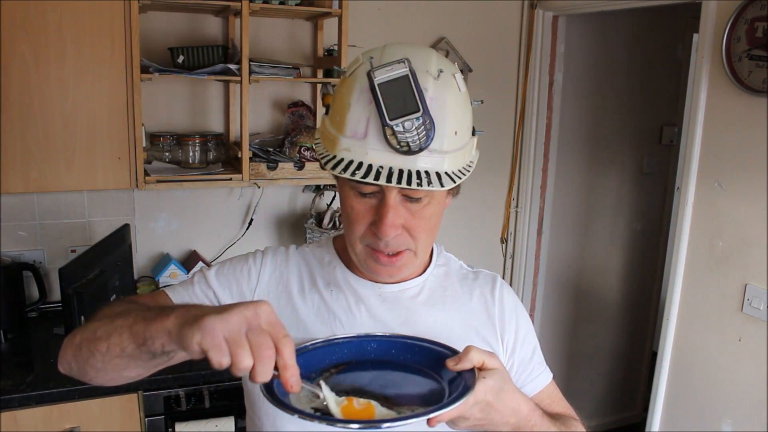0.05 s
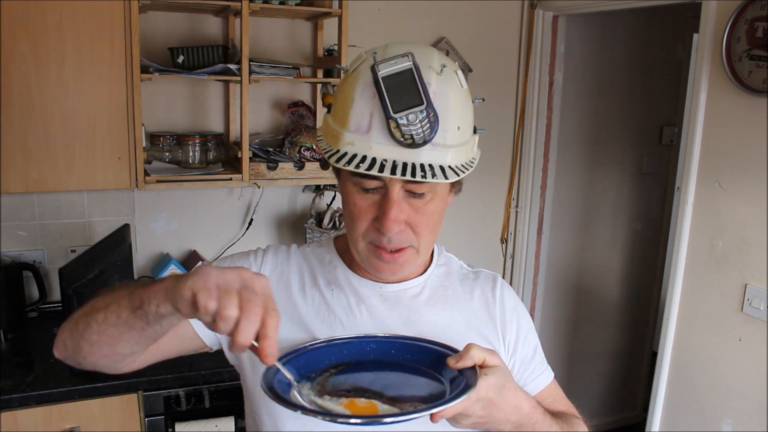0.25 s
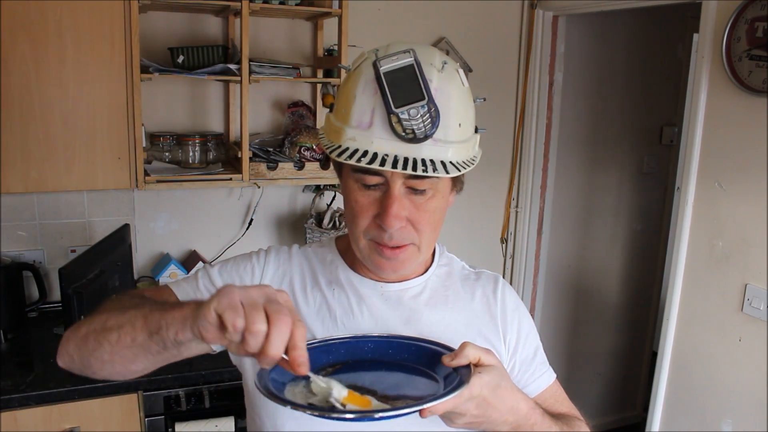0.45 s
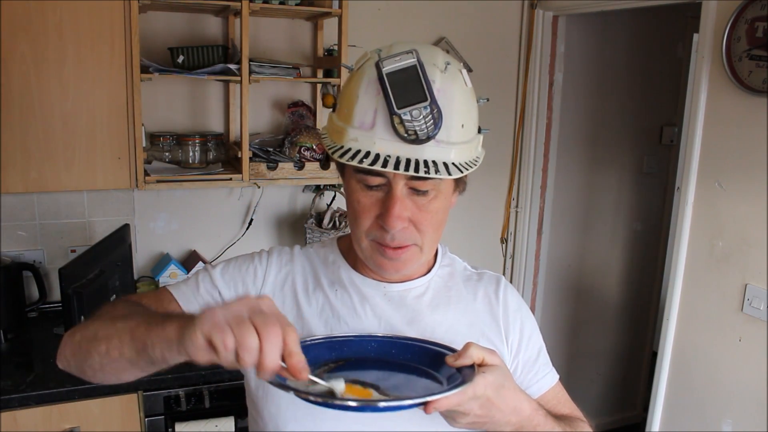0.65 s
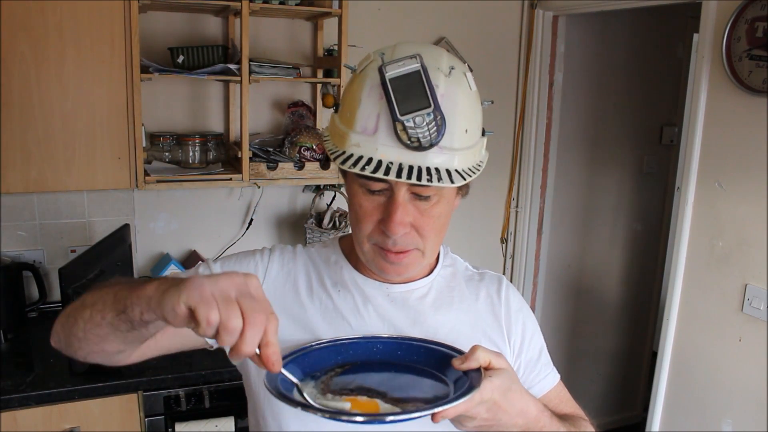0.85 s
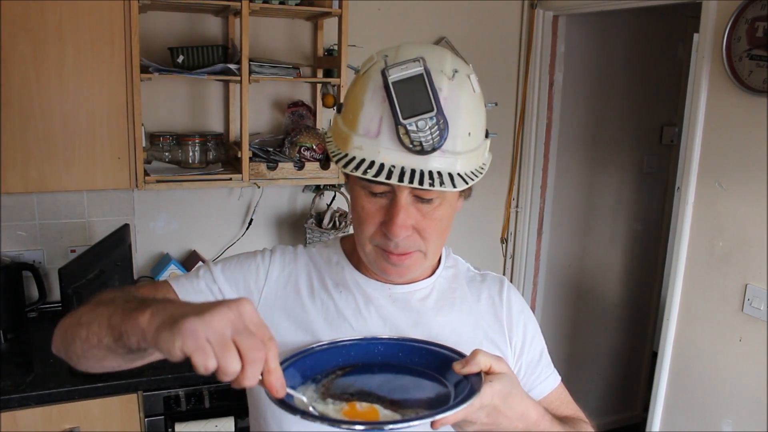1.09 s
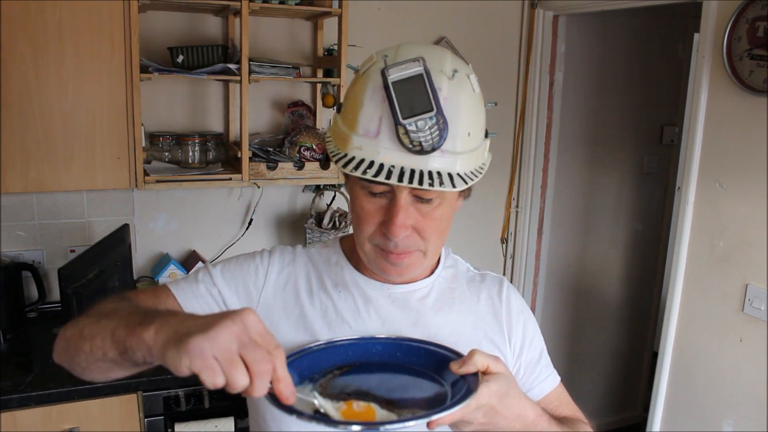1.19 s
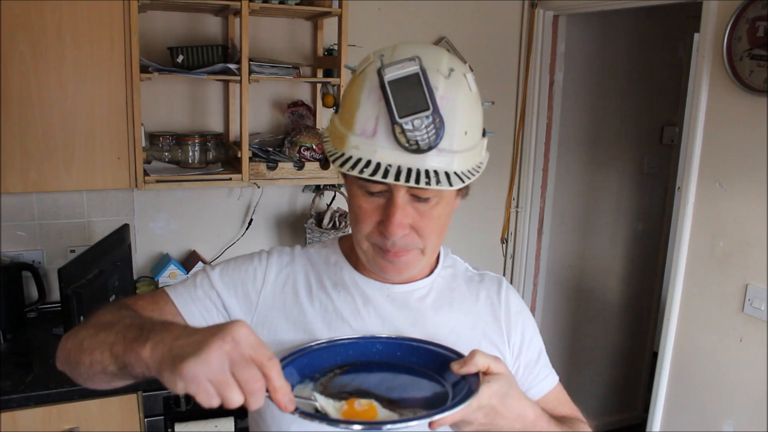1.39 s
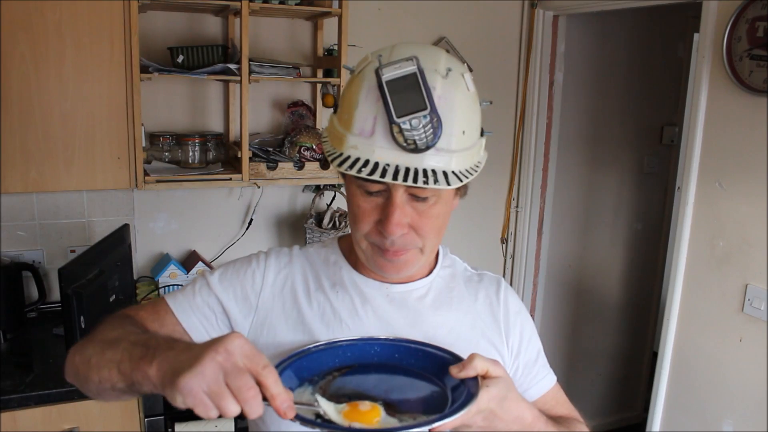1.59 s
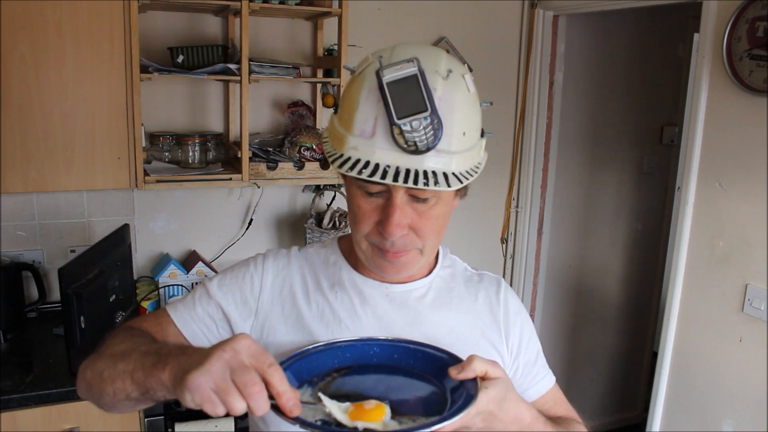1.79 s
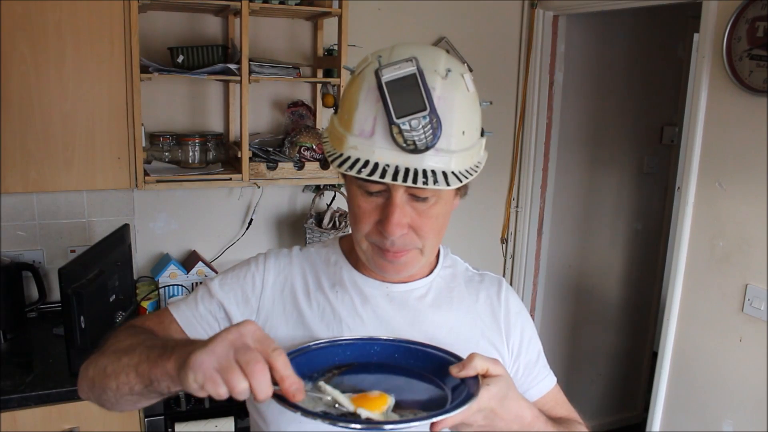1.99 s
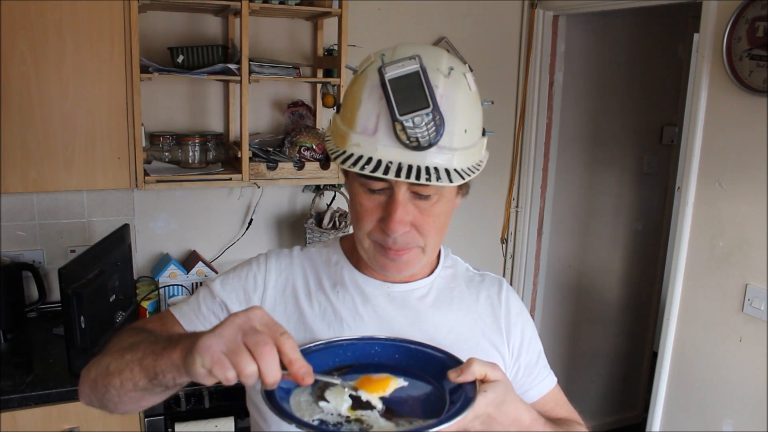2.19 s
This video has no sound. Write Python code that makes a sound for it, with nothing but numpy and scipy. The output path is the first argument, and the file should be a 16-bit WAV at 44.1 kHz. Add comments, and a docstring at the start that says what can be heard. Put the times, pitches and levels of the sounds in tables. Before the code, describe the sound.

Fork clinking and scraping on a dinner plate while cutting soft food, faint appliance hum behind

```python
"""In a small kitchen, a steel fork cuts a fried egg on a hand-held plate.
The fork strikes the plate, drags across it twice in stick-slip scrapes, and taps it again.
Blows excite the damped modes of plate and fork; trains of slips excite them during the drags.
The soft food squelches in puffs of filtered noise, and the plate gives a low rubbing note.
An appliance hums as a wavering sine, and near the end a second low tone runs down."""
import sys
import numpy as np
from scipy import signal
from scipy.fft import rfft, irfft
from scipy.io import wavfile

SR = 44100
rng = np.random.default_rng(int(sys.argv[2]) if len(sys.argv) > 2 else 0)


def generate_wav(signal):
    """Clip the signal to [-1, 1] and save it as 16-bit WAV at the path in sys.argv[1]."""
    frames = np.transpose(np.atleast_2d(signal))
    scaled = np.clip(frames, -1, 1) * 32767
    pcm = np.round(scaled).astype(np.int16)
    wavfile.write(sys.argv[1], SR, pcm)


N = 99225

# modes of the plate, damped by hand and food: (frequency [Hz], relative level [dB], T60 [s])
PLATE_MODES = [(386, -11.5, 0.048), (924, -23, 0.056), (1315, -2.5, 0.026), (1530, 1, 0.0061),
               (2178, -7.5, 0.078), (2365, 1.5, 0.021), (2850, -2.5, 0.017), (3044, 1.5, 0.022),
               (3747, 1.5, 0.023), (4196, -5, 0.053), (4883, -11.5, 0.036), (5640, -12.5, 0.048),
               (6300, -15, 0.0081), (6970, 0.5, 0.0081)]
# modes of the fork: (frequency [Hz], relative level [dB], T60 [s])
FORK_MODES = [(769, -12.5, 0.069), (950, -13, 0.059), (1514, -6, 0.03), (1750, -9, 0.069), (2296, -6, 0.12),
              (2523, 10.5, 0.027), (2850, -24.5, 0.13), (3160, -1, 0.1), (3440, 0, 0.025), (3912, 4, 0.029),
              (4494, -8.5, 0.013), (5280, -13.5, 0.062), (7370, -18, 0.034)]
# spectrum of bare steel ticking on glaze: (frequency [Hz], relative level [dB])
GLAZE_SPECTRUM = [(100, -38), (2500, -21), (5500, 6), (8000, 2), (11000, -3.5), (16000, -15)]


def amp(db):
    """Level and amplitude: 20 dB is a factor of ten."""
    return 10 ** (np.asarray(db) / 20)


def evened(x):
    """Normalization: scales a signal to rms 1."""
    return x / np.sqrt(np.mean(x ** 2) + 1e-20)


def read(points, hz):
    """Interpolation of a spectrum along a logarithmic frequency axis."""
    f, value = np.transpose(points)
    return np.interp(np.log(hz + 1), np.log(f + 1), value)


def curve(rows, axis=1):
    """Linear interpolation: one column of a time table at every sample."""
    rows = np.array(rows)
    return np.interp(np.arange(N) / SR, rows[:, 0], rows[:, axis])


def add(mix, s, sound):
    """Superposition: mixes a sound in at time s."""
    start = max(round(s * SR), 0)
    part = mix[start:][:len(sound)]
    part += sound[:len(part)]


def high_pass(x, order, cut_hz):
    """Butterworth filter: attenuates what lies below the cutoff."""
    return signal.sosfilt(signal.butter(order, cut_hz, "highpass", fs=SR, output="sos"), x)


def noise(spectrum):
    """Spectral shaping: steady noise with the given relative spectrum, rms 1."""
    gain = amp(read(spectrum, np.fft.rfftfreq(N, 1 / SR)))
    return evened(irfft(rfft(rng.standard_normal(N)) * gain, N))


def band(hz, width_hz):
    """Resonance: noise in one band, at half amplitude width_hz from its centre; rms 1."""
    f = np.fft.rfftfreq(N, 1 / SR)
    resonance = 1 / (1 + ((f - hz) / width_hz) ** 2)
    return evened(irfft(rfft(rng.standard_normal(N)) * resonance, N))


def click(spectrum, size=8192):
    """Minimum phase: a causal click of energy 1 with the given spectrum."""
    log_gain = np.log(amp(read(spectrum, abs(np.fft.fftfreq(size, 1 / SR)))))
    # the Hilbert transform of the log gain supplies the phase
    out = np.fft.ifft(np.exp(np.conj(signal.hilbert(log_gain)))).real
    return out / np.linalg.norm(out)


def ring(modes, size=8192):
    """Modal superposition: the dying modes of a small struck object, weak in the bass, energy 1."""
    t = np.arange(size) / SR
    out = np.zeros(size)
    for k, (hz, db, t60) in enumerate(modes):
        decay = np.exp(-np.log(1000) * t / t60)
        out += (-1) ** k * amp(db) * decay * np.sin(2 * np.pi * hz * t)
    out = high_pass(out, 2, 300)
    return out / np.linalg.norm(out)


def burst(spectrum, decay_s):
    """Rough contact: tiny slips that die in a few milliseconds, energy 1."""
    t = np.arange(SR // 40) / SR
    slips = rng.standard_normal(len(t)) * np.exp(-t / decay_s)
    out = signal.fftconvolve(slips, click(spectrum))
    return out / np.linalg.norm(out)


def glaze():
    """Hard contact: bare steel on glaze gives a short, high tick."""
    return burst(GLAZE_SPECTRUM, decay_s=0.0071)


def contact(s, blow, bright_hz, tick_db):
    """Contact stiffness: a softer contact rolls off a blow's treble; bare steel adds a tick."""
    u = 1j * np.fft.rfftfreq(len(blow), 1 / SR) / bright_hz
    softened = irfft(rfft(blow) / (1 + np.sqrt(2) * u + u ** 2))
    out = np.zeros(N)
    add(out, s, softened)
    add(out, s, amp(tick_db) * glaze())
    return out


def pair(a, b, likeness):
    """Coherence: two unrelated signals become a stereo pair of given likeness at each frequency."""
    same = np.clip(read(likeness, np.fft.rfftfreq(len(a), 1 / SR)), -1, 1)
    right = irfft(same * rfft(a) + np.sqrt(1 - same ** 2) * rfft(b), len(a))
    return np.array([a, right])


def kitchen(x, wet_db):
    """Room impulse response: direct sound, early echoes and an exponentially decaying diffuse tail."""
    # reverberation time: (frequency [Hz], T60 [s])
    room_t60 = [(150, 0.26), (600, 0.3), (1800, 0.33), (4500, 0.35), (9000, 0.27), (16000, 0.18)]
    # likeness of the two sides of the tail: (frequency [Hz], left-right correlation [-1 to 1])
    room_likeness = [(100, -0.51), (500, 0.99), (1500, 0.62), (3000, 0.5), (5000, 0.48), (8000, -0.17),
                     (16000, -0.77)]
    # early echoes off chest, hat and cupboards: (left delay [s], right delay [s], gain [ratio])
    early_echoes = [(.0034, 0.003, 0.3), (.0066, 0.0063, 0.18), (.0078, 0.0091, -0.096),
                    (0.0166, .0144, 0.18)]
    onset_s = 0.0017

    diffuse = pair(*rng.standard_normal((2, SR // 2)), room_likeness)
    hz, t, z = signal.stft(diffuse, SR, nperseg=256)
    decay = np.exp(-np.log(1000) * t / read(room_t60, hz)[:, None])
    response = signal.istft(z * decay, SR, nperseg=256)[1]
    response = response * np.minimum(np.arange(response.shape[1]) / SR / onset_s, 1) ** 2
    # energy of the left tail relative to the direct sound
    response *= amp(wet_db) / np.linalg.norm(response[0])
    response[:, 0] += 1  # direct sound
    for left_s, right_s, gain in early_echoes:
        response[[0, 1], [round(left_s * SR), round(right_s * SR)]] += gain
    return signal.fftconvolve(x[None], response, axes=1)[:, :N]


def room_air(level_db=-54):
    """Broadband noise: steady room air, almost uncorrelated between the sides."""
    # spectrum of the air: (frequency [Hz], relative density [dB per Hz])
    air_spectrum = [(15, -44), (25, -24.5), (58, -17), (92, -2), (130, -5), (180, -5.5), (439, -9.5),
                    (775, -10), (5880, -17.5), (11900, -25.5), (16000, -31.5)]
    # likeness of the two sides: (frequency [Hz], left-right correlation [-1 to 1])
    air_likeness = [(40, 0.18), (500, 0)]
    return amp(level_db) * pair(noise(air_spectrum), noise(air_spectrum), air_likeness)


def appliance(hum_db=1, octave_db=-21, rumble_db=-61):
    """Phase integration: a wavering hum with its octave, a lower tone running down, and rumble."""
    # the hum: (time [s], level before hum_db [dB], frequency [Hz])
    hum_course = [(0.0, -55, 134.3), (0.22, -48.5, 133.4), (0.27, -61, 129.3), (0.37, -47.5, 134.8),
                  (0.47, -41, 133.6), (0.66, -52, 135.4), (0.87, -45, 130), (1.02, -61, 134.7),
                  (1.13, -51.5, 131.6), (1.23, -54.5, 133.1), (1.28, -71.5, 130.9), (1.48, -49.5, 132.3),
                  (1.63, -55.5, 132.3), (2.01, -52.5, 129.5), (2.1, -64, 128.1), (2.25, -52.5, 129.6)]
    # the tone that runs down: (time [s], frequency [Hz], rms level [dB])
    rundown_course = [(0, 73.2, -63), (.5, 71.1, -64.5), (1.0, 67.46, -73), (1.55, 66.5, -84),
                      (1.7, 59.85, -55.5), (1.9, 53, -53.5), (2.1, 45.3, -47), (2.19, 42.9, -56.5),
                      (2.25, 40.3, -70)]
    hum_phase = 2 * np.pi * np.cumsum(curve(hum_course, axis=2)) / SR
    hum_tone = np.sin(hum_phase) + amp(octave_db) * np.sin(2 * hum_phase)
    hum = amp(curve(hum_course) + hum_db) * hum_tone
    low_phase = 2 * np.pi * np.cumsum(curve(rundown_course)) / SR
    low = amp(curve(rundown_course, axis=2)) * np.sin(low_phase)
    rumble = amp(rumble_db) * band(57.3, 12)
    return np.sqrt(2) * (hum + low) + rumble  # root two turns rms into sine amplitude


def ticking(count=4, decay_s=0.0055, first_s=1.851, period_s=0.083, tick_hz=681.4, tick_db=-50.5):
    """Damped oscillation: faint, evenly spaced ticks, each a quickly dying note."""
    out = np.zeros(N)
    t = np.arange(SR // 10) / SR
    tick = amp(tick_db) * np.sin(2 * np.pi * tick_hz * t) * np.exp(-t / decay_s)
    for k in range(count):
        add(out, first_s + k * period_s, tick)
    return out


def food(attack_s=0.00023, width_hz=300, wet_db=-15, low_cut_hz=330):
    """Filtered noise: the pushed food gives soft dull puffs with a little wet fizz."""
    # puffs, the last of them a faint late tick near 681 Hz, like those in ticking():
    # (time [s], twice the decay constant [s], level before decay [dB], centre [Hz])
    puffs = [(0.161, 0.019, -38, 668), (0.176, 0.048, -40.5, 593), (0.226, 0.018, -32.5, 747),
             (0.234, 0.022, -26.5, 860), (.648, 0.016, -39, 680), (.662, 0.0092, -38, 570),
             (0.965, 0.023, -43, 560), (.47, .09, -48.5, 720), (1.511, 0.035, -59, 910),
             (1.552, .014, -50, 620), (2.226, 0.014, -54, 681)]
    out = np.zeros(N)
    t = np.arange(SR // 4) / SR
    for s, length, db, hz in puffs:
        puff = (band(hz, width_hz) + amp(wet_db) * band(2500, 2000))[:len(t)]
        envelope = np.minimum(t / attack_s, 1) * np.exp(-2 * t / length)
        add(out, s, amp(db) * puff * envelope)
    return high_pass(out, 4, low_cut_hz)


def rubbing():
    """Driven resonance: fork pressure, and later handling, give the plate a low note."""
    # level of the note: (time [s], level before the room [dB])
    rub_level = [(0, -58.5), (.13, -56.5), (.22, -47), (.31, -43.5), (.36, -37), (.43, -44.5), (.6, -58),
                 (.68, -52), (.76, -46.5), (.82, -59.5), (.97, -46), (1.06, -63.5), (1.33, -66),
                 (1.385, -55.5), (1.42, -60.5), (1.55, -60.5), (1.8, -80), (2.11, -73), (2.15, -56.5),
                 (2.2, -70)]
    # its resonances: (frequency [Hz], half-width at half amplitude [Hz], relative level [dB])
    rub_modes = [(359.3, 29, -2.5), (413.6, 30, -2.5)]
    note = sum(amp(db) * band(hz, width) for hz, width, db in rub_modes)
    return amp(curve(rub_level)) * evened(note)


def brushes(wet_db=2):
    """Light impact: the tines brush the glaze with high ticks."""
    # brushes: (time [s], level of the direct sound [dB])
    brush_times = [(0.165, -30), (0.345, -8.5), (0.61, -30), (.649, -31.5), (1.277, -36.5)]
    out = np.zeros(N)
    for s, db in brush_times:
        add(out, s, amp(db) * glaze())
    return kitchen(out, wet_db)


def taps(wet_db=0, decay_s=.0012):
    """Brief impact: the fork's edge lands with a small crisp click."""
    # taps: (time [s], level of the direct sound [dB])
    tap_times = [(1.4392, -13.5), (1.4413, -13), (1.4483, -24)]
    # spectrum of a tap: (frequency [Hz], relative level [dB])
    tap_spectrum = [(100, -16), (550, -14), (950, -0.5), (1200, -8.5), (1650, 4.5), (3000, 0), (3750, -0.5),
                    (4900, -6.5), (5700, -26), (9000, -35), (16000, -40)]
    out = np.zeros(N)
    for s, db in tap_times:
        add(out, s, amp(db) * burst(tap_spectrum, decay_s))
    return kitchen(out, wet_db)


def knocks(wet_db=1, decay_s=0.0025):
    """Damped impact: through the food the fork makes a dry clack, with a faint tick on the glaze."""
    # knocks: (time [s], level before softening [dB], brightness [Hz], glaze tick level [dB])
    knock_times = [(1.5957, -0.5, 2420, -27), (1.5978, -3, 2400, -26), (1.6066, -4, 2100, -33)]
    # spectrum of a knock: (frequency [Hz], relative level [dB])
    knock_spectrum = [(60, -25.5), (250, -33.5), (410, 1), (540, -15), (930, -6.5), (1150, -10.5),
                      (1450, -0.5), (2100, 5), (2750, -3), (4300, -5), (5800, -9.5), (9000, -38),
                      (16000, -27)]
    out = np.zeros((2, N))
    for s, db, bright_hz, tick_db in knock_times:
        blow = amp(db) * burst(knock_spectrum, decay_s)
        out += kitchen(contact(s, blow, bright_hz, tick_db), wet_db)
    return out


def squeals(width_hz=23):
    """Mode locking: the slips lock briefly onto one mode, giving short rough tones."""
    # squeals: (time [s], length [s], frequency [Hz], level before swell and room [dB])
    squeal_times = [(0.07, 0.079, 5540, -59), (0.269, 0.09, 2200, -34), (0.28, 0.054, 2433, -30),
                    (0.768, 0.03, 5280, -42), (0.788, 0.021, 1800, -32.5), (0.81, 0.016, 3270, -32.5),
                    (.817, 0.014, 1785, -38.5), (0.838, 0.049, 2760, -37.5), (0.904, 0.019, 3856, -34.5)]
    out = np.zeros(N)
    for s, length, hz, db in squeal_times:
        u = np.arange(0, 1, 1 / (length * SR))  # progress through the squeal
        swell = np.sin(np.pi * u ** (3 / 4))
        tone = evened(band(hz, width_hz)[:len(u)])
        add(out, s, amp(db) * swell * tone)
    return out


def chatter(low_cut_hz=1400):
    """Stick-slip oscillation: nearly regular slips whose overtones slide through the modes."""
    # rate of the slips: (time [s], rate before random drift [Hz])
    slip_rate = [(.6, 439.6), (.739, 769.4), (.783, 776.2), (.792, 881.6), (.83, 889), (.865, 914),
                 (.95, 861)]
    wander = .015 * band(0, 14)  # slow drift of the log rate, width in Hz
    jitter = .04 * band(0, 438)  # fast drift
    rate = curve(slip_rate) * np.exp(wander + jitter)
    # one impulse at each whole cycle
    slips = np.diff(np.floor(np.cumsum(rate) / SR), prepend=0)
    return evened(high_pass(slips, 2, low_cut_hz))  # weak in the fundamental


def gliding(slips, modes, node_db=4, node_hz=9):
    """Modal coupling: each mode swells and fades as the contact point crosses its nodes."""
    shares = np.array([amp(db) * np.sqrt(t60) for hz, db, t60 in modes])
    shares /= np.linalg.norm(shares)
    out = np.zeros(N)
    for share, mode in zip(shares, modes):
        drift = evened(amp(node_db * band(0, node_hz)))
        out += share * drift * signal.fftconvolve(slips, ring([mode]))[:N]
    return out


def scrape(force, plate_db, fork_db, grit_db, glaze_db, chatter_db):
    """Stick-slip friction: every slip of the tines is a tiny blow; firm ones ring plate and fork."""
    # grit of steel on glaze: (frequency [Hz], relative level [dB])
    grit_spectrum = [(100, -25), (300, -10.5), (750, -2.5), (1100, -3), (1550, 9.5), (1900, -0.5),
                     (3000, 4.5), (5300, 1), (6500, -8.5), (8500, -10), (10000, -14.5), (16000, -25)]
    slips_per_s, slip_spread_db = 1500, 3.5  # mean rate and scale of the exponential size spread
    clump_db, clump_hz = 3.5, 70  # the tines catch in clumps
    firm_db, ring_loss = -35, 0.42  # below this force the food damps the ring, dB lost per dB

    t = np.arange(N) / SR
    spread = np.minimum(rng.exponential(1, N), 3)
    sizes = amp(slip_spread_db * spread) * rng.choice([-1, 1], N)
    random_slips = evened(sizes * (rng.random(N) < slips_per_s / SR))
    slips = random_slips + amp(chatter_db) * chatter()
    clumped = evened(slips * amp(clump_db * band(0, clump_hz)))
    touching = (t > force[0][0]) * (t < force[-1][0])
    slips = clumped * amp(curve(force)) * touching
    firm = slips * amp(ring_loss * np.minimum(curve(force) - firm_db, 0))
    grain = amp(grit_db) * click(grit_spectrum) + amp(glaze_db) * click(GLAZE_SPECTRUM)
    grit = signal.fftconvolve(slips, grain)[:N]
    plate = amp(plate_db) * gliding(firm, PLATE_MODES)
    fork = amp(fork_db) * gliding(firm, FORK_MODES)
    return plate + fork + grit


def scrapes():
    """Friction under varying force: two drags across the plate, with squeals, heard in the room."""
    # force along each drag: (time [s], force level [dB])
    first_drag = [(.2, -59.5), (.243, -49.5), (.255, -31), (.30, -43), (.335, -32), (.35, -30.5),
                  (.375, -38), (.41, -48), (.52, -50), (.60, -55), (.64, -64)]
    second_drag = [(.739, -26), (.755, -34.5), (.765, -28), (.785, -34.5), (.80, -32), (.822, -30.5),
                   (.84, -43), (.868, -34.5), (.895, -51), (.92, -40.5), (.96, -49), (1.0, -57)]
    first = scrape(first_drag, plate_db=-6.5, fork_db=-21, grit_db=-0.5, glaze_db=-21, chatter_db=-4.5)
    second = scrape(second_drag, plate_db=-9, fork_db=-7, grit_db=-5, glaze_db=-26, chatter_db=3)
    return kitchen(first, wet_db=3) + kitchen(second + squeals(), wet_db=1.5)


def strikes():
    """Impact excitation: each blow rings plate and fork, with its own random room tail."""
    # blows: (time [s], plate ring [dB], fork ring [dB], dry clack [dB], brightness [Hz],
    # room tail [dB], glaze tick [dB])
    blows = [(0.2467, 16, -16, 7.5, 3750, -6.5, -4), (0.2486, 6, -30, 5.5, 5850, 1, -3),
             (0.344, -0.5, -30, -5.5, 5900, 3, -20), (.7390, -6, -23, -13.5, 4770, 0.5, -18),
             (0.7918, -21, -2.5, -9, 2630, 0.5, -40), (0.9084, -12, -10, -11, 4420, 4.5, -40),
             (1.0314, 2, 5, 3.5, 4340, 1, -27), (1.0336, -9, -14, -1.5, 5200, 5.5, -12.5)]
    # spectrum of the dry contact clack: (frequency [Hz], relative level [dB])
    clack_spectrum = [(40, -36.5), (200, -26.5), (400, -4.5), (600, -13), (1100, -9.5), (1700, 4.5),
                      (2400, -4), (4200, -1), (6000, -10), (10000, -8.5), (16000, -46.5)]
    plate, fork, clack = ring(PLATE_MODES), ring(FORK_MODES), click(clack_spectrum)
    out = np.zeros((2, N))
    for s, plate_db, fork_db, clack_db, bright_hz, wet_db, tick_db in blows:
        blow = amp(plate_db) * plate + amp(fork_db) * fork + amp(clack_db) * clack
        out += kitchen(contact(s, blow, bright_hz, tick_db), wet_db)
    return out


def scene():
    """Superposition of fork and plate in the kitchen over hum and room air."""
    background = room_air() + appliance()
    soft = kitchen(rubbing() + food() + ticking(), wet_db=-9.5)
    light = brushes() + taps() + knocks()
    return background + soft + light + scrapes() + strikes()


def record(dry, left_db=-1.5, clip_level=.9, edge_hz=16100):
    """Saturation and band limit: a weaker left channel, clipped peaks, then a steep low-pass."""
    both = np.clip(dry * amp([[left_db], [0]]), -clip_level, clip_level)
    low_pass = signal.firwin(511, edge_hz, window=("kaiser", 9), fs=SR)
    return signal.oaconvolve(both, low_pass[None], "same")


dry = scene()
out = record(dry)
generate_wav(out)
```